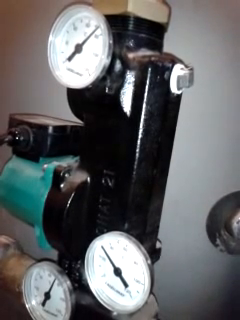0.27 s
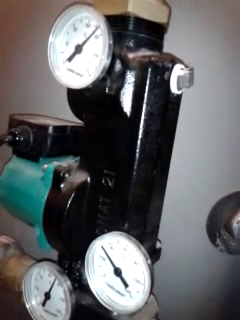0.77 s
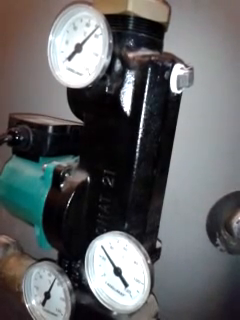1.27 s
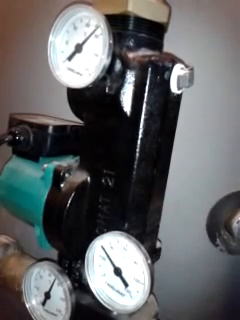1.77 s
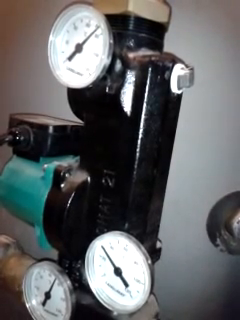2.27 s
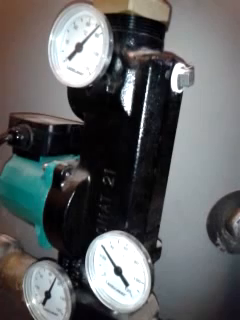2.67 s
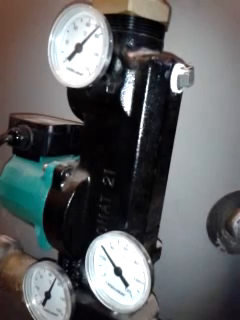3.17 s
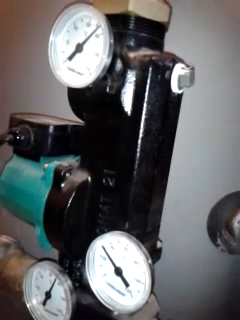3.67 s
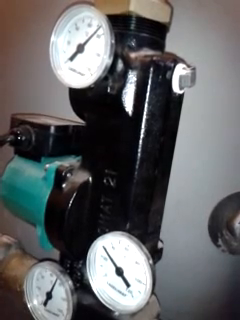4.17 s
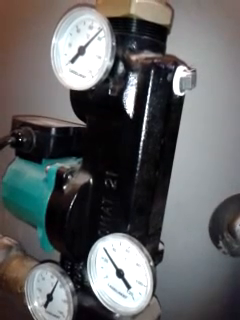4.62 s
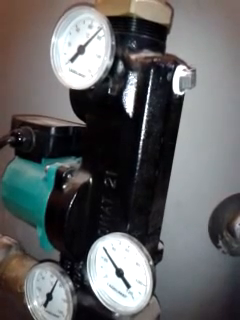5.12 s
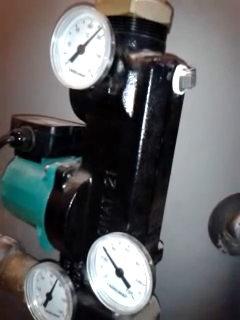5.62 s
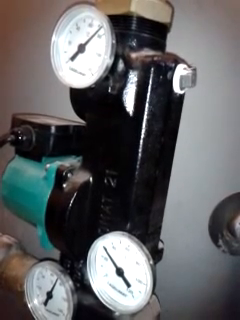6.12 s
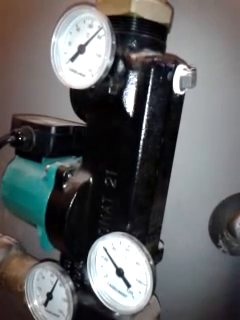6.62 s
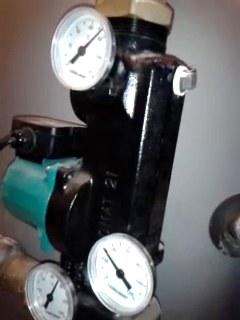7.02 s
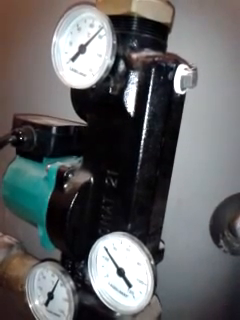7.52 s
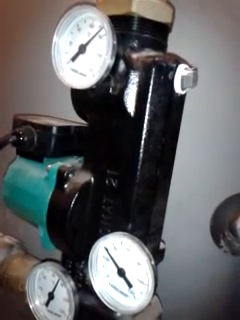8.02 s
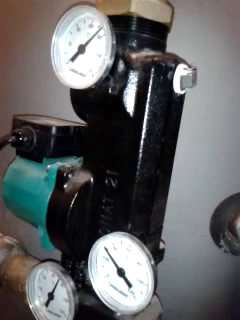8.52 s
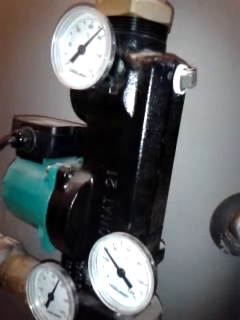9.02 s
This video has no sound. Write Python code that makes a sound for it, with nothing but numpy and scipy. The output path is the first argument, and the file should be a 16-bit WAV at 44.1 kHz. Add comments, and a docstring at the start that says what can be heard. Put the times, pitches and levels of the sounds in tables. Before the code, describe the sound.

Close to a heating pump in a small bare room, a low hum throbs gently over deep pipe rumble and soft water rush. Faint motor whine and thin whistles waver above. Expanding metal ticks irregularly: barely audible at first, clear near three seconds, loudest just after five, then several more, each with a short ringing decay. The sound is mono and slightly dull on top.

```python
"""Circulation pump with ticking metal

A heating circulation pump runs steadily in a small bare room, heard from close by.
Water rumbles and rushes as shaped noise and excites the housing resonances, one of them heard as the hum.
The motor adds thin sine tones of fixed pitch and wavering level, and whistles that also waver in pitch.
Now and then the warm metal unit slips as it expands: a sharp tick of dense noise and decaying modes
rings briefly in the room."""
import sys
import numpy as np
from scipy import signal
from scipy.fft import rfft, irfft
from scipy.io import wavfile
from scipy.ndimage import uniform_filter1d

SR = 44100
rng = np.random.default_rng(int(sys.argv[2]) if len(sys.argv) > 2 else 0)


def unload_wav(signal):
    """Save mono or channel-first audio to the path in sys.argv[1] as 16-bit WAV at rate SR, clipped to [-1, 1]."""
    wavfile.write(
        sys.argv[1],
        SR,
        np.round(np.clip(np.atleast_2d(signal).T, -1, 1) * 32767).astype(np.int16),
    )


N = 409668  # samples, 9.29 s


def from_db(db):
    """Logarithmic level: decibels become an amplitude gain."""
    return 10 ** (np.asarray(db) / 20)


def at_hz(points, hz):
    """Spectral envelope: levels are interpolated along a logarithmic frequency axis."""
    points = np.array(points)
    return np.interp(np.log(hz + 1e-3), np.log(points[:, 0]), points[:, 1])


def in_time(rows):
    """Temporal envelope: a curve is interpolated at every sample."""
    return np.interp(np.arange(N) / SR, *np.transpose(rows))


def bins(size):
    """Fourier analysis: frequencies in Hz of the spectrum of so many samples."""
    return np.arange(size // 2 + 1) * SR / size


def noise(gain, size):
    """Spectral shaping: white noise is filtered to the given amplitude per root Hz."""
    white = rng.standard_normal(size)
    return irfft(rfft(white) * gain, size) * np.sqrt(SR / 2)


def drift(rate_hz):
    """Random modulation: low-passed noise of unit standard deviation, 6 dB down at rate_hz."""
    slow = noise(1 / (1 + (bins(N) / rate_hz) ** 2), N)
    return slow / np.std(slow)


def resonance(hz, centre, width, db):
    """Resonance: a peak with steep skirts, 12 dB down at one width from its centre."""
    return from_db(db) / (1 + ((hz - centre) / width) ** 2) ** 2


def uneven(hz, spacing_hz, ripple_db, count=12):
    """Interference: random ripples over frequency; each run of count ripples keeps its power."""
    ripple = np.interp(hz / max(spacing_hz, 12), np.arange(SR), rng.standard_normal(SR))
    gain = from_db(ripple_db * ripple)
    run_bins = int(count * spacing_hz / hz[1])
    return gain / np.sqrt(uniform_filter1d(gain ** 2, size=run_bins))


# rumble of the pipework: f/Hz, level/dB per Hz
PIPE_SPECTRUM = [(6, -61.5), (14, -38), (31, -43.5), (42, -48.5), (65, -51.5), (88, -55), (106, -68.5),
                 (185, -67.5), (212, -73.5), (400, -116.5)]


def pipe_rumble():
    """Flow-induced vibration: steady turbulent water shakes the pipes as low-frequency noise."""
    return noise(from_db(at_hz(PIPE_SPECTRUM, bins(N))), N)


# rush of the water: f/Hz, relative level/dB per Hz
RUSH_SPECTRUM = [(150, -78), (360, -69), (520, -75.5), (690, -80), (830, -72.5), (960, -76.5),
                 (1230, -76.5), (1440, -84), (1600, -82), (2000, -85.5), (2700, -88), (3700, -90),
                 (4800, -95.5), (7000, -100.5)]


def water_rush(flow_db=-1.2, churn_db=0.85, churn_hz=7.7):
    """Turbulence noise: the flow hisses, coloured by standing waves, while its level churns."""
    hz = bins(N)
    standing_waves = uneven(hz, 30, np.interp(hz, [3000, 5000], [1.6, 2.6]))
    rush = noise(from_db(at_hz(RUSH_SPECTRUM, hz) + flow_db) * standing_waves, N)
    return rush * from_db(churn_db * drift(churn_hz))


# resonances of housing and pipes: f/Hz, width/Hz, peak level/dB per Hz
HOUSING_RESONANCES = [(118.7, 15, -62), (152.8, 9.1, -65), (251.7, 14, -65.5), (281, 11, -60.5),
                      (334, 18, -63.5), (356.5, 10, -67.5), (397.6, 14, -67.5), (441.4, 16, -71.5),
                      (511, 8.1, -73), (624, 14, -72), (735, 9, -73), (778, 18, -74), (1003.7, 16.7, -65),
                      (1094.7, 23.8, -66), (1166, 42, -70), (2378, 97, -83), (3476, 220, -89)]


def housing_drone(surge_db=0.97, surge_hz=5.9):
    """Forced resonance: the flow keeps housing and pipes ringing, in gentle surges."""
    hz = bins(N)
    response = sum(resonance(hz, *row) for row in HOUSING_RESONANCES)
    return noise(response, N) * from_db(surge_db * drift(surge_hz))


# tones of the impeller: multiple of the shaft speed, typical rms level/dB
SHAFT_TONES = [(2, -48), (8, -62), (12, -62), (24, -63)]
# magnetic hum of the motor: multiple of the mains frequency, typical rms level/dB
MAINS_TONES = [(6, -60.5), (8, -65.5), (12, -70.5), (24, -63)]
# thin whistles: mean f/Hz, typical rms level/dB
WHISTLE_TONES = [(157, -58), (325, -57), (1398, -73), (2907, -67), (3596, -72), (4533, -77), (4694, -81),
                 (5050, -80), (5179, -79), (5701, -79)]
SHAFT_HZ, MAINS_HZ = 46.08, 50


def motor(waver_db=3.5, waver_hz=5.4, wander=0.0007, load_hz=3):
    """Harmonic excitation: all levels waver; shaft and mains pitch holds, whistles wander with the load."""
    t = np.arange(N) / SR
    out = np.zeros(N)
    # integrating the load turns it into a relative frequency deviation (rms: wander)
    whistle_time = t + wander * np.cumsum(drift(load_hz)) / SR
    tones = [(order * SHAFT_HZ * t, db) for order, db in SHAFT_TONES]
    tones += [(order * MAINS_HZ * t, db) for order, db in MAINS_TONES]
    tones += [(hz * whistle_time, db) for hz, db in WHISTLE_TONES]
    for cycles, db in tones:
        amplitude = np.sqrt(2) * from_db(db + waver_db * drift(waver_hz))
        out += amplitude * np.sin(2 * np.pi * (cycles + rng.random()))
    return out


# the main resonance: f/Hz, width/Hz, peak level/dB per Hz before the slow level
HUM_RESONANCE = (312.5, 11, -55)
# slow level of the hum: t/s, relative level/dB
HUM_CURVE = [(0, -1.5), (0.6, 0.5), (1.2, -1.5), (2.6, 0.5), (4.65, -2.0), (5.1, 0), (5.7, 2), (7.05, 1.5),
             (8.2, 0), (8.6, 2.5), (9.29, -2.5)]


def hum(throb_db=1.5, throb_hz=3.6):
    """Narrow-band noise: the main resonance flutters and throbs by chance around its slow level."""
    flutter = noise(resonance(bins(N), *HUM_RESONANCE), N)
    # running rms over a third of a second, used to level out the slower swings
    running_rms = np.sqrt(uniform_filter1d(flutter ** 2, size=SR // 3))
    level = from_db(in_time(HUM_CURVE) + throb_db * drift(throb_hz))
    return flutter * np.std(flutter) / running_rms * level


# the unit's dense, overlapping modes: f/Hz, relative level/dB per Hz
DENSE_SPECTRUM = [(150, -10), (330, -3), (570, -14.5), (1100, -0.5), (1450, -9), (1780, -1.5), (2050, -2.5),
                  (2450, 1.5), (3350, -3), (4100, -6.5), (4900, -13), (6400, -14), (7300, -23)]


def clatter(t, low_db, knock_db, treble_db, dense_db=-32.5, hollow_db=7, bright_db=11,
            hold=0.017, t60=0.18, treble_t60=0.15, tail_db=-24, tail_t60=0.63):
    """Diffuse decay: dense modes and wall reflections hold briefly, then die, the treble first."""
    hz = bins(len(t))
    top = np.interp(hz, [3300, 5000], [0, 1])
    # where the metal slips decides which registers, and which modes within them, answer
    register_db = np.interp(hz, [1250, 1750, 2300], [low_db, knock_db + hollow_db, 0])
    register_db = register_db + top * (treble_db + bright_db)
    mode_pattern = uneven(hz, 35, 4.5)
    colour = from_db(at_hz(DENSE_SPECTRUM, hz) + dense_db + register_db) * mode_pattern
    late = np.maximum(t - hold, 0)
    # the square roots share the power between the two bands
    middle = noise(colour * np.sqrt(1 - top), len(t)) * np.exp(-np.log(1000) * late / t60)
    treble = noise(colour * np.sqrt(top), len(t)) * np.exp(-np.log(1000) * late / treble_t60)
    tail = noise(colour, len(t)) * from_db(tail_db) * np.exp(-np.log(1000) * t / tail_t60)
    return middle + treble + tail


# separate modes of the metal unit: f/Hz, relative level/dB, 60 dB decay time t60/s
METAL_MODES = [(439, -4, .25), (468, -4, .18), (730, -3, .28), (1099, -1, .27), (1592, -14, .22),
               (1664, -15, .22), (1774, -15, .2), (2059, -11, .17), (2338, -7.5, .25), (2511, -2.5, .22),
               (2633, -12, .18), (2664, -13, .18), (2714, -6, .17), (2964, -8.5, .15), (3090, -13, .17),
               (3170, -10, .17), (3451, -14, .16), (3691, -13, .16)]


def ringing(t, low_db, scatter_db=1.0):
    """Modal decay: each slip strikes the modes unequally; a deep slip reaches the low ones."""
    hz, db, t60 = np.array(METAL_MODES).T[:, :, None]
    depth_db = low_db * np.interp(hz, [1200, 1600], [1, 0])
    strength = from_db(db + depth_db + scatter_db * rng.standard_normal(hz.shape))
    waves = np.sin(2 * np.pi * (hz * t + rng.random(hz.shape)))
    decay = np.exp(-np.log(1000) * t / t60)
    return np.sum(strength * decay * waves, axis=0)


# slips of the expanding metal: t/s, level/dB, then relative levels:
# deep register/dB, knock register/dB, treble/dB, ringing modes/dB
SLIPS = [(0.888, -60.5, 3, -15.2, 8, -6), (1.414, -38.5, 4, -2, -4, -6),
         (2.919, -20, -12, -11.5, -15.5, -13), (4.752, -46.5, -4.8, -7, -6.5, -2),
         (5.395, -14, -5.5, -12, -13, 0.5), (6.117, -18.5, -13, -10, -8.5, -6.5),
         (6.610, -29, -2.5, -14, -15.5, -.5), (7.233, -43, 5, 8, -16, -3), (7.355, -51, -7, -3, -7.5, 0),
         (8.516, -39, -10, -12, -7, 0)]


def ticks(build_up=0.0066, lead=0.0047):
    """Impulsive excitation: each tick swells for a few milliseconds as reflections gather."""
    t = np.arange(SR // 2) / SR
    out = np.zeros(N + SR)
    rise = 1 - np.exp(-(t / build_up) ** 2)
    for time, db, low_db, knock_db, treble_db, ring_db in SLIPS:
        start = int((time - lead) * SR)  # the swell begins just before the listed time
        tick = clatter(t, low_db, knock_db, treble_db) + from_db(ring_db) * ringing(t, low_db)
        out[start:start + len(t)] += from_db(db) * tick * rise
    return out[:N]


def scene():
    """Superposition: water, motor, hum and ticks add at one microphone."""
    water = pipe_rumble() + water_rush() + housing_drone()
    return (water + motor() + hum() + ticks())[None]


CUTOFF_HZ = 7250


def record(dry):
    """Band limitation: a narrow-band recorder, an elliptic low-pass, cuts the top steeply."""
    # order 12, passband ripple 0.2 dB, stopband 85 dB down
    low_pass = signal.ellip(12, 0.2, 85, CUTOFF_HZ, fs=SR, output="sos")
    return signal.sosfilt(low_pass, dry)


dry = scene()
out = record(dry)
unload_wav(out)
```